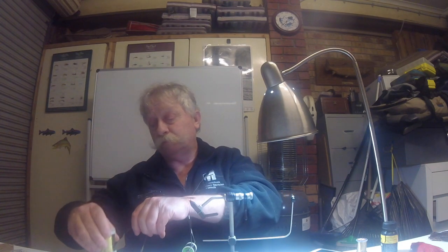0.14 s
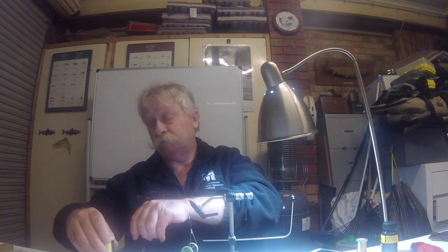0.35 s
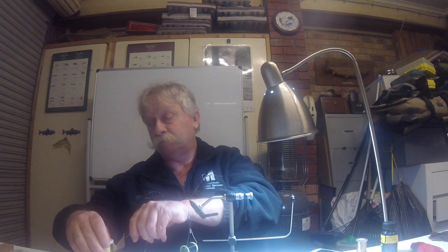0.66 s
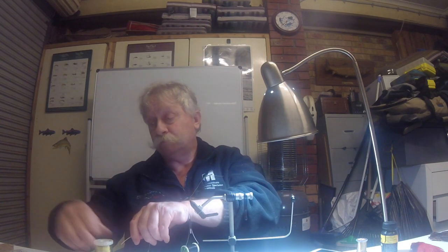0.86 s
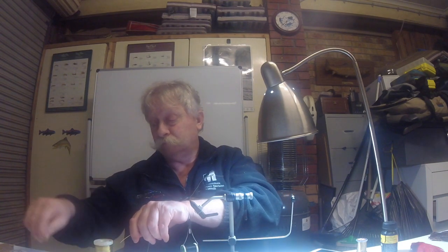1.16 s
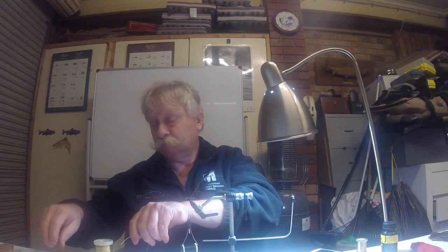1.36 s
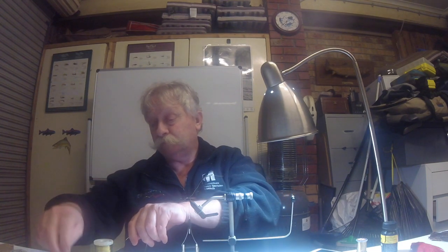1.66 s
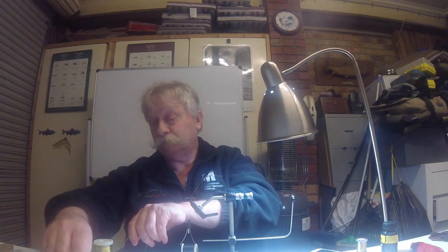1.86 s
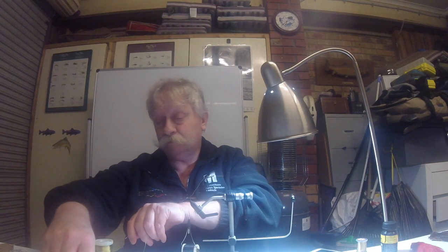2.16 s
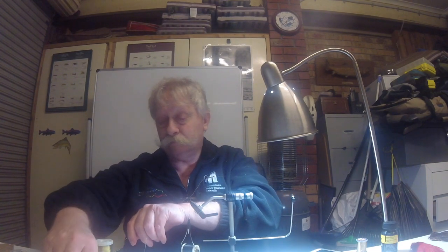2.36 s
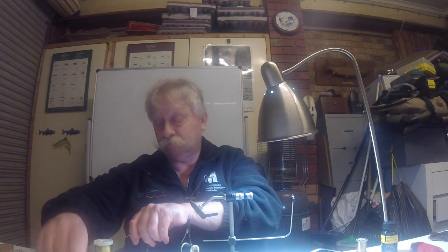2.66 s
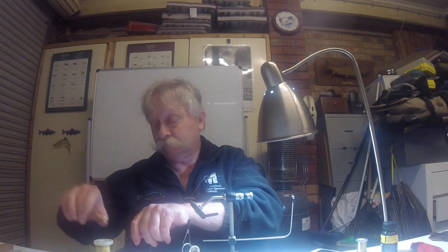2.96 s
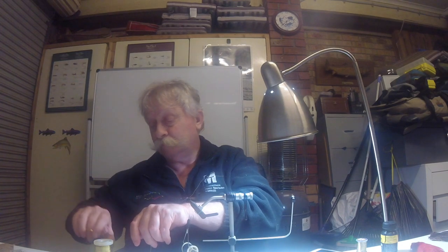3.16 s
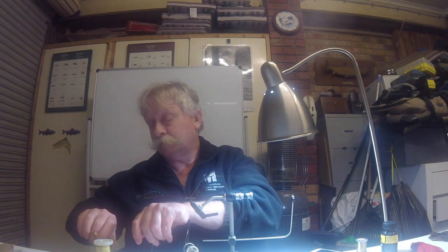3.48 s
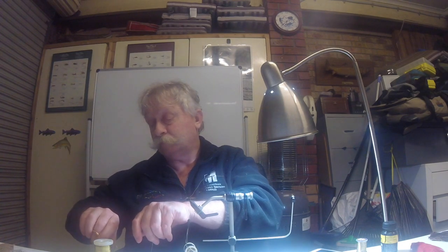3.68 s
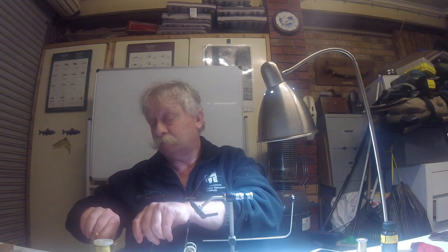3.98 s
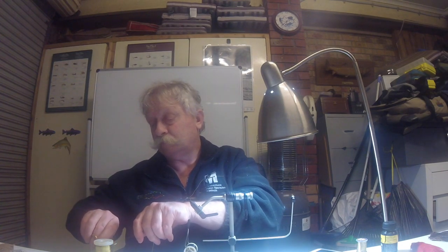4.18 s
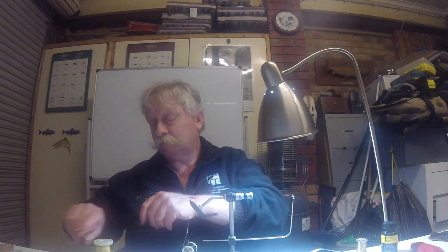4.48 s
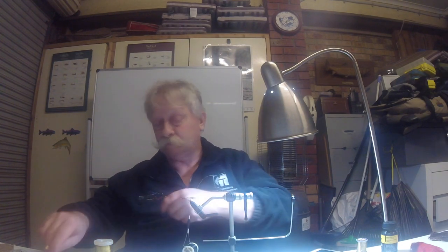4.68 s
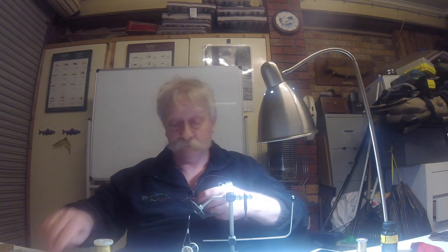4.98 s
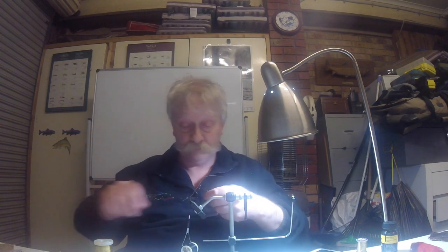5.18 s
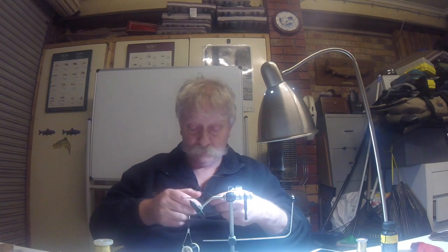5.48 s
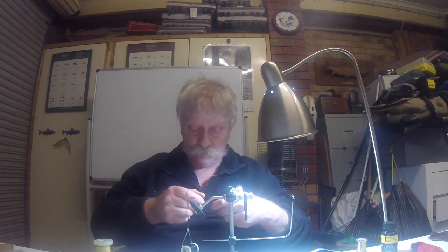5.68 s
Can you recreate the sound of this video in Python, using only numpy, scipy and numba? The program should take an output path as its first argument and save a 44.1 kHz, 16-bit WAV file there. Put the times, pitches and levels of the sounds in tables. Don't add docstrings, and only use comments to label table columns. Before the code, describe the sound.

Hollow knocks on a workbench, two bursts of wood and metal rattling, the last one loudest, over low hum and faint hiss.

```python
import sys
import numpy as np
from scipy import signal
from scipy.fft import rfft, irfft
from scipy.io import wavfile
from scipy.ndimage import uniform_filter1d
from numba import njit

SR = 44100
rng = np.random.default_rng(int(sys.argv[2]) if len(sys.argv) > 2 else 0)


def voltage_ratio(decibels):
    exponent = np.asarray(decibels, float) / 20
    return 10 ** exponent


def pcm_store(signal):
    levels = np.round(np.clip(np.atleast_2d(signal), -1, 1) * 32767)
    wavfile.write(sys.argv[1], SR, levels.astype(np.int16).T)


N = 257544
TIME = np.arange(N) / SR

# [f/Hz, density level/dB]
HUM_SPECTRUM = [(12, -31), (20, -6.5), (38, -6.5), (70, 1), (91, -7), (126, -14), (160, -16.5), (458, -24),
                (672, -27), (1010, -28), (2500, -34.5), (3250, -45.5), (5500, -120)]
# [f/Hz, density level/dB]
HISS_SPECTRUM = [(1470, -70), (2500, -9.5), (3650, -10), (4290, -19), (5180, -14), (5950, -12), (6310, 0),
                 (6640, 1.5), (7040, -3), (9700, -12), (12600, -14.5), (13600, -19), (14300, -44)]
# [t/s, level/dB]
CAR_LEVEL = [
    (2.7, -70),
    (3.3, -63),
    (3.9, -60.5),
    (4.5, -61),
    (5.3, -59.5),
    (5.84, -62),
]
# [t/s, slow sway level/dB, hum level/dB]
LEANS = [
    (0.55, -34, -45),
    (0.74, -47, -38),
    (1.12, -37.5, -43),
    (2.05, -33, -37),
    (2.31, -32.5, -44),
    (2.44, -46, -45),
    (2.6, -30.5, -46),
    (3.95, -40.5, -53),
    (4.9, -32.5, -51),
    (5.09, -33, -43),
]
# [f/Hz, t60/s]
ROOM_T60 = [(100, 0.37), (300, 0.24), (1000, 0.48), (3000, 0.61), (9000, 0.32)]
# [t/s, level/dB, ring f/Hz, t60/s]
TICKS = [(0.8354, -51, 5370, 0.022), (.878, -51, 1100, 0.017), (.8368, -48, 6400, 0.037),
         (1.1566, -57, 4900, .008), (1.157, -44, 4000, 0.0047), (1.757, -58, 3500, .01),
         (2.1302, -38, 5040, 0.02), (2.235, -49, 5150, 0.021), (2.557, -48, 5100, .02),
         (3.8039, -63, 3500, .01), (4.197, -38.5, 3000, 0.0021), (4.1953, -39, 7350, 0.0042),
         (5.0198, -41, 6200, 0.11)]
# [t/s, duration/s, wood level/dB, metal level/dB, settling rate/(dB per s)]
SHAKES = [
    (2.003, 0.11, -22, -28, 65),
    (2.147, 0.17, -29, -58, 90),
    (2.401, 0.056, -35, -31.5, 300),
    (2.477, 0.15, -29, -40, 117),
    (2.591, 0.11, -35, -42, 143),
    (4.795, 0.063, -27, -34.5, 34),
    (4.862, 0.26, -28.5, -42, 35),
    (5.02, .018, -25, -24, 30),
    (5.041, .25, -15, -16.5, 110),
]
# [t/s, deep bench modes level/dB, upper bench modes level/dB]
THUDS = [(1.999, -23, -22), (2.03, -22, -30), (2.095, -39, -32), (2.141, -23, -40), (2.233, -25.5, -33.5),
         (2.301, -24, -39.5), (2.405, -21, -39), (2.414, -24, -31.5), (2.555, -26, -30.5),
         (2.584, -30, -32), (2.611, -48, -30.5), (4.8, -27, -30), (4.859, -26.5, -32), (4.918, -47, -37),
         (5.02, -40, -32), (5.037, -33, -41), (5.069, -20, -40), (5.085, -23, -39), (5.242, -40, -47.5)]
# [t/s, tap level/dB, deep bench mode level/dB, middle mode level/dB, upper modes level/dB]
SET_DOWN = [
    (0.511, -20.5, -18.5, -29.5, -38.5),
    (0.626, -25, -29, -28.5, -40),
    (0.777, -30.5, -40, -25.5, -26.5),
]
# [t/s, box hollow level/dB, box wall level/dB, metal level/dB, strongest metal ring f/Hz]
KNOCKS = [(1.9992, -23, -25.5, -20, 5340), (2.0177, -22.5, -24.5, -23, 3600),
          (2.0313, -19, -17, -22.5, 2750), (2.0452, -27.5, -35, -49, 2300), (2.0628, -26, -31, -50, 2740),
          (2.0957, -26, -31, -40, 2660), (2.1286, -32.5, -31.5, -28, 3560), (2.2342, -31, -38.5, -38, 3520),
          (2.331, -41, -46, -43.5, 3160), (2.4012, -31.5, -45, -31.5, 3370),
          (2.4162, -35.5, -33, -39.5, 2730), (2.472, -32, -33, -44, 2690),
          (2.5289, -35.5, -32.5, -44, 2720), (2.554, -33.5, -42, -36, 2420), (2.586, -21, -22.5, -25, 5050),
          (2.6123, -30.5, -47, -38, 3040), (2.662, -50, -54, -50, 2990), (4.79, -38, -31, -23, 2100),
          (4.8594, -31.5, -29.5, -35, 3620), (5.0202, -22, -22, -30.5, 2230),
          (5.0389, -13.5, -10, -12, 2620), (5.0887, -29, -20, -21.5, 2580)]
# [f/Hz, density level/dB]
CRACK_SPECTRUM = [(290, -30), (600, -6), (1070, 1), (1900, -7.5), (3300, -1), (5500, -10), (9100, -19),
                  (13000, -67)]
# [f/Hz, level/dB, t60/s]
BENCH = [(33.6, -15, 0.4), (79.6, -9, 0.45), (110.1, -4.5, 0.37), (189, -1.5, 0.17), (238.6, -17, 0.19),
         (310, -11, 0.13)]
# [f/Hz, level/dB, t60/s]
SPOOL = [(552, -10, 0.076), (756, -8, 0.047), (836, -2.5, 0.023), (1016, 2, 0.021), (1140, 4, 0.013),
         (1390, -8, 0.018), (1810, -14, 0.014), (2230, -11, 0.032), (2450, -9, 0.021), (2800, -14, 0.012),
         (3170, -14.5, 0.017), (3830, -16, 0.017), (4700, -18, 0.0081)]
# [f/Hz, level/dB, t60/s]
BOX = [(219, -6, 0.045), (271, -4, 0.079), (287.7, -6.5, 0.084), (375, -5, 0.057), (447.3, 0.5, 0.051),
       (488, -4.5, 0.074), (627, -5, 0.031), (698, 1, 0.036), (765, -2, 0.042), (913, -3.5, 0.048),
       (953, 0.5, 0.024), (1100, 0.5, 0.023), (1200, -0.5, 0.017), (1380, -16, 0.017), (1524, 1, 0.019),
       (1690, -2, 0.017), (1920, -26, 0.0089)]
# [f/Hz, level/dB, t60/s]
METAL = [(2054, 1.5, 0.015), (2420, 2, 0.011), (2780, -1, 0.028), (3240, -2.5, 0.021), (3560, -5, 0.02),
         (3680, -2, 0.012), (4030, -1, 0.0082), (4470, -14, 0.0022), (5080, 0, 0.013), (5390, -2.5, 0.0039),
         (6200, -1, 0.024), (6700, -34, 0.002), (7730, -18, 0.02), (8860, -24, 0.0048), (9600, -24, .01),
         (11400, -13, 0.012)]


def level(x, db):
    return x * voltage_ratio(db) / np.sqrt(np.mean(x ** 2))


def colour(x, points):
    hz, db = np.transpose(points)
    at = np.log(np.maximum(np.arange(len(x) // 2 + 1) * SR / len(x), 1))
    return irfft(rfft(x) * voltage_ratio(np.interp(at, np.log(hz), db, -90, -90)), len(x))


def band(x, hz, width_hz):
    return signal.lfilter(*signal.iirpeak(hz, hz / width_hz, fs=SR), x)


def noise():
    return rng.standard_normal(N)


def walk(rate_hz):
    k = int(SR / rate_hz)
    steps = np.repeat(rng.standard_normal(N // k + 1), k)
    return 1.2 * uniform_filter1d(uniform_filter1d(steps, k), k)[:N]


@njit
def add(out, start, size, pole, length):
    for k in range(len(start)):
        z = size[k] + 0j
        for i in range(start[k], min(start[k] + length[k], len(out))):
            out[i] += z.imag
            z *= pole[k]


def decaying_pole(hz, t60):
    return np.exp(2j * np.pi * hz / SR - np.log(1000) / (t60 * SR))


def ring(modes, s, db, scatter_db, detune, push_s, same_spot=False):
    hz, mode_db, t60 = np.transpose(modes)
    chance = rng.standard_normal((len(s), 3, len(modes)))
    sign = 1 if same_spot else np.sign(chance[:, 1])
    size = voltage_ratio(db + mode_db + scatter_db * chance[:, 0]) * sign
    pole = decaying_pole(hz * np.exp(detune * chance[:, 2]), t60)
    start = np.repeat((s * SR).astype(np.int64), len(modes))
    length = np.tile((t60 * SR * 2 / 3).astype(np.int64), len(s))
    out = np.zeros(N)
    add(out, start, size.ravel(), pole.ravel(), length)
    push = np.hanning(int(push_s * SR) + 3)
    return np.convolve(out, push / push.sum())[:N]


def floor_hum():
    return level(colour(noise(), HUM_SPECTRUM), -47) * voltage_ratio(0.4 * walk(3))


def microphone_hiss():
    return level(colour(noise(), HISS_SPECTRUM), -59.5)


def distant_car():
    return level(band(noise(), 1000, 315), 0) * voltage_ratio(np.interp(TIME, *np.transpose(CAR_LEVEL), left=-120))


def leaning(column, rest_db):
    rise_db_per_s, fade_db_per_s = 256, 85
    rows = np.array(LEANS)
    since = TIME - rows[:, :1]
    drop_db = np.maximum(-rise_db_per_s * since, fade_db_per_s * since)
    strongest_db = np.max(rows[:, column:column + 1] - drop_db, axis=0)
    return voltage_ratio(np.maximum(strongest_db, rest_db))


def bench_tremor():
    sway = level(band(band(noise(), 38, 8.4), 38, 8.4), -1.8)
    hum = level(band(band(noise(), 65, 47), 65, 47), -6.5)
    return sway * leaning(1, rest_db=-54.5) + hum * leaning(2, rest_db=-52.5)


def workshop(x):
    t = np.arange(SR) / SR
    tail = np.zeros(SR)
    for hz, t60 in ROOM_T60:
        echoes = band(rng.standard_normal(SR), hz, hz * 0.94)
        tail += echoes * np.exp(-np.log(1000) * t / t60) / np.sqrt(hz)
    tail *= 1 - np.exp(-t / 0.0019)
    return signal.fftconvolve(x, tail / np.sqrt(np.sum(tail ** 2)))[:N]


def ticks():
    s, db, hz, t60 = np.transpose(TICKS)
    out = np.zeros(N)
    start, length = (s * SR).astype(np.int64), (t60 * SR).astype(np.int64)
    add(out, start, voltage_ratio(db), decaying_pole(hz, t60), length)
    return out


def rattle(start_s, lasts_s, wood_db, metal_db, settle_db_per_s):
    count, span_s = 275, 0.25
    chance = rng.random((count, 2))
    since = chance[:, 0] * span_s
    size_db = np.where(since < lasts_s, -3.0 * np.log(1 - chance[:, 1]), -200)
    dull_db = wood_db - settle_db_per_s * since + size_db
    bright_db = metal_db - 1.16 * settle_db_per_s * since + size_db
    s = start_s + since
    wood = ring(BOX, s, dull_db[:, None] - 30.0, 2.3, 0.049, 0.00033)
    metal = ring(METAL, s, bright_db[:, None] - 21.5, 2.3, 0.1075, 0.00007)
    return wood + metal


def thuds():
    s, deep_db, upper_db = np.transpose(THUDS)[:, :, None]
    is_deep = np.array(BENCH)[:, 0] < 150
    bench_db = np.where(is_deep, deep_db - 4.5, upper_db + 4.5)
    return ring(BENCH, s.ravel(), bench_db, 1.0, 0.024, 0.0029)


def spool():
    s, tap_db, deep_db, middle_db, upper_db = np.transpose(SET_DOWN)
    bench_db = np.transpose([deep_db - 7.0, deep_db, middle_db, upper_db, upper_db, upper_db]) + 7.0
    bench_late_s = 0.0084
    bench = ring(BENCH, s + bench_late_s, bench_db, 0, 0, 0.0025, same_spot=True)
    tap = ring(SPOOL, s, tap_db[:, None] - 8.5, 2.16, 0.027, 0.0001)
    return bench, tap


def crack(s, wall_db, metal_db):
    metal_share, over_db, decay_s = 0.72, 7.5, 0.0023
    crack_db = wall_db + metal_share * (metal_db - wall_db) + over_db
    burst = np.zeros(N)
    burst[(s * SR).astype(int)] = voltage_ratio(crack_db.ravel())
    burst = signal.lfilter([1], [1, -np.exp(-1 / (decay_s * SR))], burst)
    return voltage_ratio(3.0) * colour(burst * noise(), CRACK_SPECTRUM)


def knocks():
    s, hollow_db, wall_db, metal_db, ring_hz = np.transpose(KNOCKS)[:, :, None]
    s = s.ravel()
    air = crack(s, wall_db, metal_db)
    is_hollow = np.array(BOX)[:, 0] < 545
    box_db = np.where(is_hollow, hollow_db - 6.0, wall_db - 7.0)
    favour_db = 4 * np.exp(-(np.log(np.array(METAL)[:, 0] / ring_hz) / 0.2) ** 2)
    for late_s, soft_db in [(0, 0), (0.0022, -3), (0.0055, -1.5)]:
        air += ring(BOX, s + late_s, box_db + soft_db, 1.63, 0.041, 0.00025)
        air += ring(METAL, s + late_s, metal_db + favour_db + soft_db - 12.0, 2.5, 0.099, 0.00007)
    return air


def scene():
    background = floor_hum() + microphone_hiss() + distant_car() + bench_tremor()
    small_parts = ticks() + sum(rattle(*row) for row in SHAKES)
    set_down_bench, tap = spool()
    bench = set_down_bench + thuds()
    air = small_parts + knocks()
    wet = workshop(air + voltage_ratio(-4.0) * tap + voltage_ratio(-8.5) * bench)
    return (bench + tap + air + voltage_ratio(-5.5) * wet + background)[None]


def roll_off(x):
    return signal.sosfilt(signal.butter(12, 14420, fs=SR, output="sos"), x)


def record(dry):
    top = signal.sosfiltfilt(signal.butter(8, 12400, "high", fs=SR, output="sos"), dry)
    body = signal.sosfiltfilt(signal.butter(2, 300, "high", fs=SR, output="sos"), dry)
    loud_db = 10 * np.log10(uniform_filter1d(body ** 2, size=2048) + 1e-12)
    given_up = np.clip((loud_db + 48.0) / 9.7, 0, 1)
    return roll_off(dry - given_up * top)


dry = scene()
out = record(dry)
pcm_store(out)
```